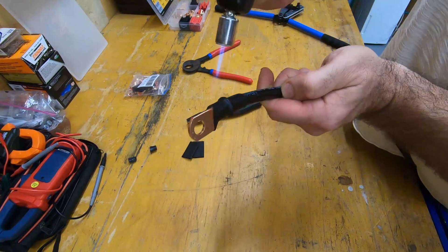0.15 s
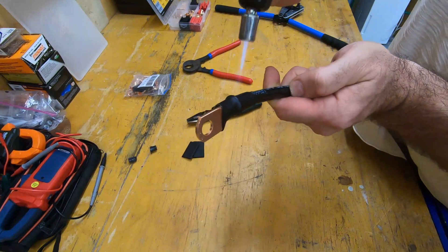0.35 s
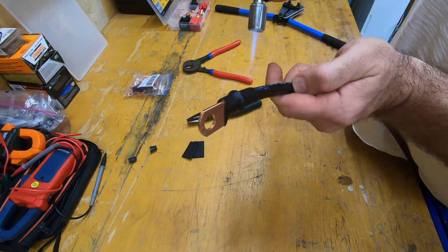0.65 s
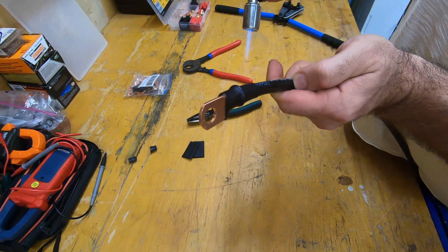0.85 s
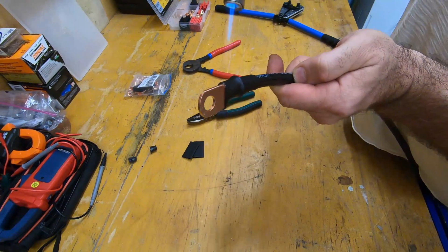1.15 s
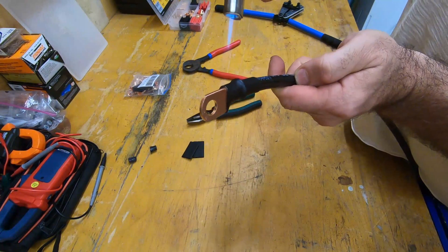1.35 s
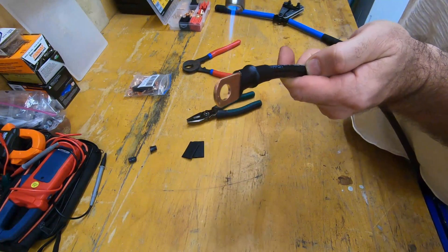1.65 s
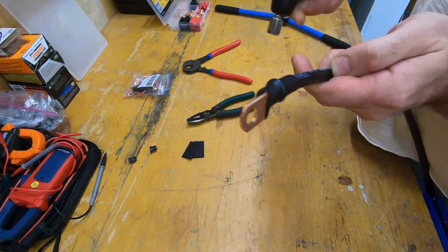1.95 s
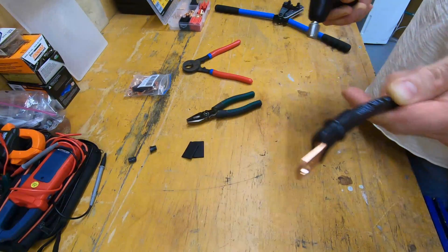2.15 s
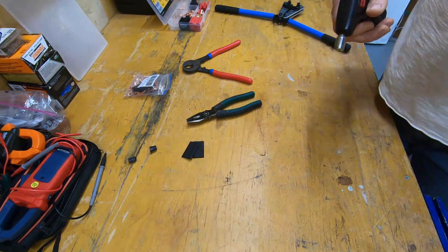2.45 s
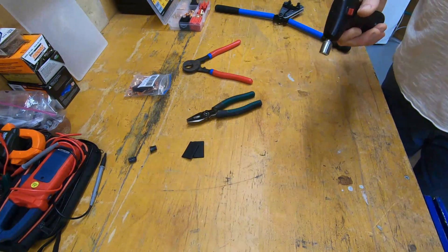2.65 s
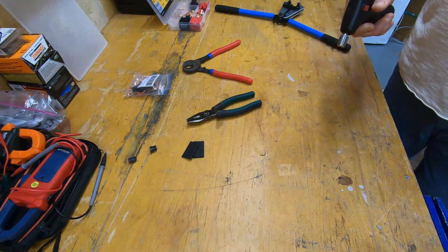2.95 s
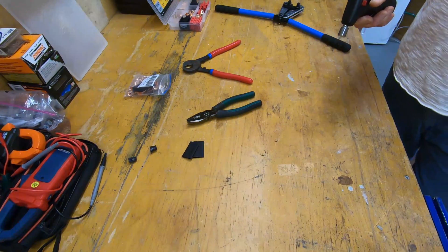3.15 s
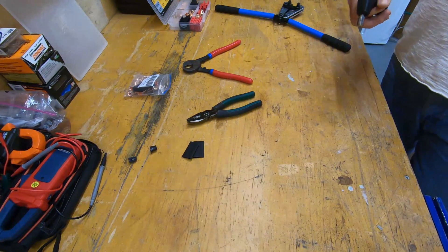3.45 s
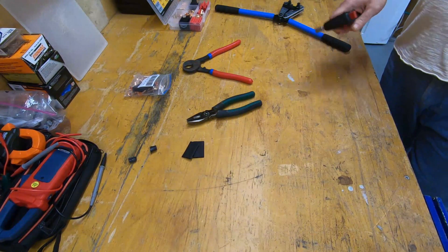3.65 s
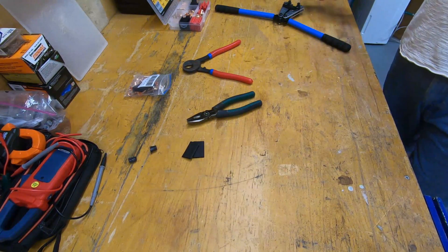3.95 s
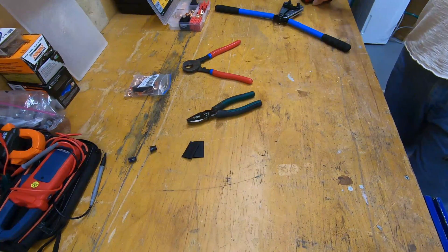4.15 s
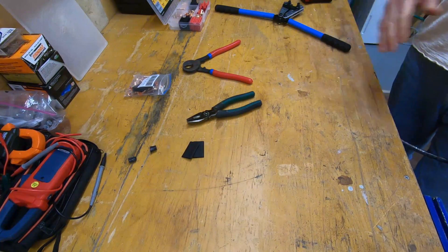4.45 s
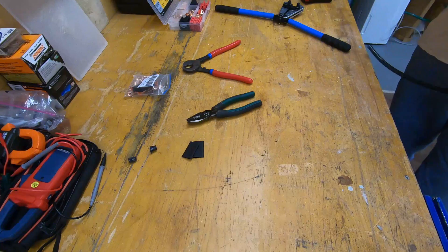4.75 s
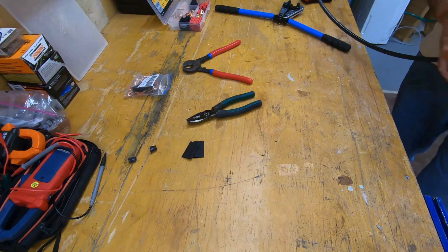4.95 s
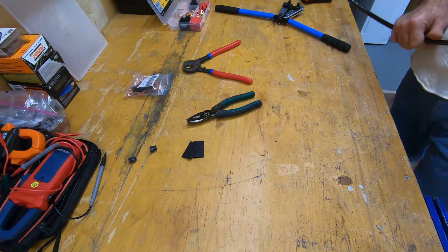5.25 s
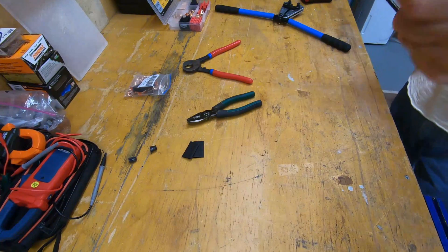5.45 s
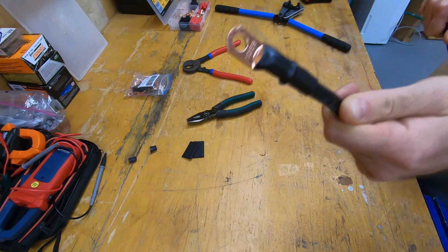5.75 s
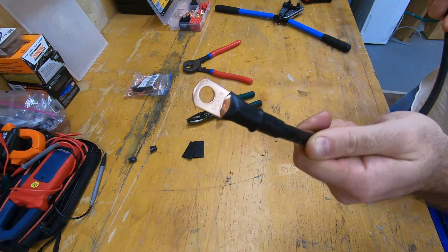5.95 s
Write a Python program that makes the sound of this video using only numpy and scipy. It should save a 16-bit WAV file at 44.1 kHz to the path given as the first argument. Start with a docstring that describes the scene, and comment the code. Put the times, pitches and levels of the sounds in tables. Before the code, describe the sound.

A gas torch hisses steadily, clicks off sharply, then a cable and the torch knock, scrape and clatter on a wooden workbench over low fan rumble.

```python
"""A butane torch hisses over a wooden workbench until its switch clicks off: jet turbulence excites tube modes.
Clicks are impulses filtered by the casing; knocks are decaying bench modes with rattling contacts.
The torch base scrapes by friction and is stood down; a cable rumbles, squeaks and sings amid soft brushes.
A fan rumbles and hums behind it all, as shaped and narrow-band noise."""
import sys
import numpy as np
from scipy import signal
from scipy.fft import rfft, irfft, next_fast_len
from scipy.io import wavfile
from scipy.ndimage import uniform_filter1d, minimum_filter1d

SR = 44100
rng = np.random.default_rng(int(sys.argv[2]) if len(sys.argv) > 2 else 0)


def generate_wav(sig):
    """Save sig (samples, or channels by samples) to the path in sys.argv[1] as 16-bit PCM at SR."""
    pcm = np.round(np.clip(np.atleast_2d(sig).T, -1, 1) * 32767).astype(np.int16)
    wavfile.write(sys.argv[1], SR, pcm)


N = 268833
T = np.arange(N) / SR  # time axis [s]
TOP_HZ = 15700  # upper limit of the final low-pass

# workshop background: (t/s, fan rumble level/dB, air hiss level/dB)
ROOM_LEVELS = [(1.8, -58, -68.5), (2.6, -55.5, -72), (3.7, -50.5, -65), (4.9, -50.5, -67.5),
               (5.9, -52, -71.5)]
# relative spectrum of the background air: (f/Hz, level/dB per Hz)
AIR_SPECTRUM = [(30, -25), (55, -16), (90, -23.5), (140, -5.5), (240, -1.5), (400, -2), (540, -9),
                (1300, -17.5), (2400, -26.5), (3300, -28.5), (4900, -35), (6200, -47), (11000, -54),
                (15500, -72)]
# steady hum lines at the loudest background: (f/Hz, level/dB)
HUM_LINES = [(229, -60.5), (292, -60), (443, -54.5)]
# low boom of the bench after the last heavy knock
BOOM_S, BOOM_DB, BOOM_T60_S = 4.46, -46, 1.7

# pulls of the cable over the bench edge: (t/s at the strongest, level/dB, half length/s)
CABLE_PULLS = [(2.157, -33.5, 0.015), (2.245, -39, 0.097), (2.39, -31.5, 0.032), (2.47, -43, 0.11)]
# relative spectrum of the dragged cable: (f/Hz, level/dB per Hz)
DRAG_SPECTRUM = [(24, -44), (40, -7.5), (76, -15.5), (113, 3.5), (172, -7.5), (215, 3.5), (352, -32),
                 (407, -26.5), (549, -22), (900, -26.5), (1170, -36), (1980, -120)]
# soft brushes and scrapes on the bench: (t/s at the strongest, level/dB, half length/s)
SOFT_BRUSHES = [(2.25, -67, 0.2), (2.41, -57, 0.065), (3.524, -48, 0.014), (4.21, -58, 0.0094),
                (4.27, -60, 0.028), (4.14, -65, .06), (4.6, -69, .17)]
# relative spectrum of the brushes: (f/Hz, level/dB per Hz)
BRUSH_SPECTRUM = [(500, -10.5), (1500, 7.0), (4000, -3.0), (8000, -9.5), (13000, -35.0)]
# squeaks of the cable jacket: (t/s at the strongest, level/dB, half length/s)
JACKET_SQUEAKS = [(4.208, -58, 0.01), (4.277, -52, .022)]
SQUEAK_HZ = 5480
# thin singing of the cable as it slips off the edge; the pitch sags as it slows
SLIP_S, SLIP_END_S, SLIP_FADE_S = 4.33, 4.82, 0.075
SLIP_HZ, SLIP_SAG_HZ_PER_S, SLIP_DB = 1665, 250, -57
# rough partials of the singing: (multiple of its pitch [ratio], width/Hz, level/dB over its tone)
SLIP_PARTIALS = [(1, 60, -10), (1.45, 450, -10), (1.83, 120, -13), (2.005, 130, -10), (2.6, 220, -20)]

# shoves of the torch base over the bench: (t/s at the strongest, level/dB, half length/s)
BASE_SHOVES = [(3.33, -34, 0.06), (3.389, -27, .014), (3.421, -20.5, .018), (3.455, -26.5, .016),
               (3.5, -30.5, 0.12)]
# swell of the scrape over the whole push: (t/s at the strongest, level/dB, half length/s)
WHOLE_PUSH = (3.48, -29, 0.21)
# relative spectrum of the scrape: (f/Hz, level/dB per Hz)
SCRAPE_SPECTRUM = [(40, -27.5), (130, 11.5), (300, -8.5), (650, -1.0),
                   (900, -11.5), (2000, -25.5), (5000, -37.0), (12000, -65)]
# the base judders at a steady rate, then faster as it is pushed home
JUDDER_HZ, PUSH_S, JUDDER_RISE_HZ_PER_S = 252, 3.415, 1100
STAND_S = 3.531  # the torch is stood down

# knocks on the bench: (t/s, thud level/dB, thud top f/Hz, clatter level/dB,
# hardness/dB per octave, rattle time/s, gain of the side signal/dB)
BENCH_KNOCKS = [(.63, -53, 298, -78, -1, 0.019, -8.5), (2.354, -43, 799, -55.5, -9, 0.05, 3.5),
                (2.692, -24.5, 426, -28, -4.5, 0.014, 3.5), (2.716, -24, 403, -35.5, 0.5, 0.012, 3),
                (2.747, -29.5, 257.6, -54, 4, 0.0081, 0.5), (2.791, -36.5, 400, -37.5, 0, .003, 2),
                (2.846, -42, 500, -43, -12, .003, -1), (2.916, -26, 558, -30, -2.5, 0.016, -1),
                (2.984, -36.5, 453, -63, -1, 0.048, -3.5), (3.047, -37, 524, -53.5, -1.5, 0.0074, -7.5),
                (3.085, -41.5, 600, -56.5, -1, 0.016, -5.5), (3.232, -39.5, 820, -55, -0.5, 0.012, -10.5),
                (3.528, -30.5, 803, -31.5, 2, 0.014, -24), (3.540, -26.5, 760, -35, -0.5, 0.014, -25),
                (3.569, -32, 290.2, -62, 1, 0.02, -32), (3.635, -42, 610, -54.5, 3, 0.0064, -24.5),
                (4.215, -26.5, 520, -36, 6.5, 0.025, -47), (4.281, -25.5, 365.4, -25, 5.5, .01, -47.5),
                (4.290, -25, 365, -34, 4, 0.0078, -48.5), (4.301, -28.5, 330, -36, 6, 0.016, -49),
                (4.335, -37, 353, -40, 3, 0.016, -45), (4.505, -30, 720, -48, -5, 0.022, -42.5)]
DARKER_CLATTER_BEFORE_S = 3.4  # earlier knocks have the torch-coloured clatter
CLATTER_HZ = 1032  # the bench top thuds below this, loose tools clatter above
# bands of the dense wood ring: (low f/Hz, high f/Hz)
WOOD_BANDS = [(30, 175), (175, 400), (400, 1000), (1000, 2200), (2200, 4000), (4000, 13500)]
# modes of the bench top and the tools on it: (f/Hz, relative level/dB, t60/s)
BENCH_MODES = [(55.8, -19.5, 1), (107.5, -6.5, 0.36), (138, -9.5, 0.71), (205.6, -4, 0.2),
               (232, -2.5, 0.16), (259.8, 0, 0.2), (343.4, -2, 0.21), (468.5, -14.5, 0.4), (510, -12, 0.41),
               (633, -8, 0.48), (721, -9, 0.26), (918, -15.5, 0.23), (1101, -13.5, 0.19), (1141, -12, 0.14),
               (1527, 0.5, 0.044), (1590, 2.5, 0.057), (1740, -12, 0.11), (2830, -4, 0.053),
               (3053, -7.5, 0.07)]
# dense wood ring, relative spectrum: (f/Hz, level/dB per Hz)
WOOD_SPECTRUM = [(30, -6.5), (75, -8), (112, 9.5), (240, 3), (400, 5), (850, 4.5), (1650, 1.5),
                 (2350, -8.5), (3000, -2), (4000, -18.5), (5500, -23), (8000, -37), (12000, -48),
                 (15500, -52)]
# dense wood ring, decay: (f/Hz, t60/s)
WOOD_DECAY = [(100, 0.43), (600, 0.25), (3000, 0.23), (12000, 0.2)]
# stereo width of the knocks: (f/Hz, gain of the side signal/dB)
SIDE_GAIN = [(60, -3.5), (105, -9), (140, 3), (220, -21), (380, -23.5), (520, -5), (1000, -4.5), (1550, 3),
             (2400, -14), (3200, -3), (4500, -6), (9000, 2)]
# resonances and hollows of the torch in its clatter: (f/Hz, width/Hz, level/dB)
TORCH_COLOUR = [(2480, 750, -15), (5800, 1400, -12), (7750, 600, 7), (9550, 700, 6), (11250, 500, 8),
                (12900, 300, 7)]
# the torch taps the bench: (t/s, gain of the body modes/dB, gain of the nozzle modes/dB)
TORCH_TAPS = [(2.693, 2.5, -28), (2.792, -10, -34), (2.847, -20, -40), (2.917, -0.5, -36), (3.530, 0, 2),
              (3.553, -9, 1.5)]
# modes of the torch body, before the gain of each tap: (f/Hz, level/dB, t60/s)
BODY_MODES = [(1120, -37, .1), (1450, -35, .12), (1620, -27, .08), (1790, -38, .15), (2945, -43.5, .25),
              (3170, -47, .1), (3450, -38, .08), (7750, -65, .17)]
# modes of the steel nozzle with a beating pair, before the gain of each tap: (f/Hz, level/dB, t60/s)
NOZZLE_MODES = [(2240, -47, .25), (2929, -42, .26), (3025, -45, .17), (4740, -57, .26), (5795, -42.5, .22),
                (5824, -51, .22), (7700, -62, .17), (9420, -62, .17), (11050, -63, .15), (12950, -66, .14)]
# modes of the hollow torch base as it is stood down: (f/Hz, level/dB, t60/s)
BASE_MODES = [(500, -24, 0.26), (630, -16.5, 0.14), (722, -25, 0.3)]

# small hard clicks of the torch and the hand:
# (t/s, relative level/dB, tilt/dB per octave, latch resonance/dB)
HARD_CLICKS = [(0.029, -37, 1, -4), (.245, -45, 6, 0), (0.506, -38, 3, 4), (1.78, -24, -0.5, 10),
               (1.7947, -17, 2.5, 12.5), (1.834, -27.5, -10, 10), (1.8795, -6.5, -0.5, 2),
               (2.238, -55, 10, 3.5), (2.284, -51, 7, -8), (3.226, -42, -9, 13), (3.488, -45, -1.5, 7),
               (3.73, -47.5, -5.5, 12)]
# relative spectrum of the torch casing: (f/Hz, level/dB per Hz)
CASING_SPECTRUM = [(300, -40), (700, -22), (1100, -3), (2050, 1), (2500, -8), (3400, -.5), (4150, -7.5),
                   (4900, 4), (5500, -9), (7700, -7.5), (8600, -14), (9650, -7.5), (10400, -21),
                   (13900, -26), (15500, -37.5)]
# side signal of a click: (f/Hz, gain/dB)
CLICK_SIDE_GAIN = [(2000, -5.0), (5000, -13.0), (9000, -1.0)]
LATCH_HZ, LATCH_WIDTH_HZ = 3530, 800  # resonance of the trigger latch
BEND_S = 0.002  # time that a 1 kHz bending wave takes along the casing

# the flame as the hand moves it, before the band levels below:
# (t/s, roar level/dB, hiss level/dB, finest hiss level/dB)
FLAME_LEVELS = [(0.0, -51, -51.5, -59), (0.092, -52.5, -54.5, -62), (0.25, -52, -53.5, -60),
                (0.42, -51, -52.5, -62), (0.44, -55, -54, -61), (0.484, -50.5, -55, -60),
                (0.636, -51, -53, -59.5), (1.136, -49.5, -53.5, -61.5), (1.186, -51.5, -54, -58),
                (1.352, -49, -51, -60.5), (1.548, -49.5, -53.5, -59.5), (1.724, -49.5, -51.5, -58.5),
                (1.76, -49, -51.5, -59)]
ROAR_DB, HISS_DB, FINE_DB = 1.5, -0.5, -0.5
FLAME_OFF_S = 1.875
# relative spectrum of the jet: (f/Hz, level/dB per Hz)
JET_SPECTRUM = [(40, -28), (100, -27.5), (170, -14.5), (245, 1.5), (370, -2.5), (600, -6), (1000, -7),
                (1280, -11.5), (1700, -9.5), (2600, -10.5), (4100, -15), (6400, -15.5), (9500, -23),
                (10600, -33), (15500, -43.5)]
# burner tube resonances: (f/Hz, width/Hz, level/dB over the jet)
BURNER_MODES = [(860, 92, 4), (1439, 89, 4), (3353, 240, 1.5), (4770, 830, 5), (8150, 1100, 3.5),
                (9580, 270, 4.5)]
# flame returned by the walls: (f/Hz, relative gain/dB)
WALL_GAIN = [(150, 4.5), (400, -2), (1200, 6), (2200, 0), (3700, -7), (5000, 2), (7000, 0)]
# early reflections off bench and hand: (lag/s, wander of the lag/s, share [signed ratio])
REFLECTIONS = [(.00033, .00003, -.17), (.00064, .00002, .16), (.00138, .00004, .2), (.00205, .00006, .15)]
# main tube resonance: centre, width, wander of the centre, level before the hiss gain
TUBE_HZ, TUBE_WIDTH_HZ, TUBE_DRIFT_HZ, TUBE_DB = 4930, 250, 105, -6


def undb(db):
    """Level difference: convert decibels to amplitude gain."""
    return 10 ** (np.asarray(db) / 20)


def level(x, db=0):
    """Mean-square normalisation: set the rms level in dB."""
    return x * undb(db) / np.sqrt(np.mean(x ** 2) + 1e-30)


def curve(rows):
    """Linear interpolation: read each column of a timed table sample by sample."""
    s, *columns = np.transpose(rows)
    return [np.interp(T, s, column) for column in columns]


def at(points, hz):
    """Logarithmic pitch axis: interpolate (f/Hz, value) points."""
    f, value = np.transpose(points)
    return np.interp(np.log(hz + 1), np.log(f), value)


def humps(rows, f):
    """Resonance: sum the bell-shaped responses in dB."""
    return sum(db / (1 + (2 * (f - hz) / width) ** 2) for hz, width, db in rows)


def shape(x, gain):
    """Linear filtering: multiply the spectrum by a function of frequency."""
    size = next_fast_len(x.shape[-1])
    f = np.arange(size // 2 + 1) * SR / size
    return irfft(rfft(x, size) * gain(f), size)[..., :x.shape[-1]]


def spread(mid, side):
    """Middle-and-side stereo: the side signal enters the ears with opposite signs."""
    return mid + side * np.array([[1], [-1]])


def noise(width, size=N):
    """Partial coherence: stereo white noise with width as side over middle."""
    mid, side = rng.standard_normal((2, size))
    return spread(mid, width * side) / np.sqrt(1 + width ** 2)


def coloured(points, width, size=N):
    """Spectral shaping: stereo noise of a given spectrum and unit rms."""
    return level(shape(noise(width, size), lambda f: undb(at(points, f))))


def walk(rate):
    """Low-pass random fluctuation: Gaussian cutoff at rate/Hz, unit rms."""
    return level(shape(rng.standard_normal(N), lambda f: np.exp(-(f / rate) ** 2)))


def band(x, lo, hi, order=3):
    """Band limitation: causal Butterworth band-pass."""
    return signal.sosfilt(signal.butter(order, [lo, hi], "band", fs=SR, output="sos"), x)


def pan(db):
    """Interaural level difference: left and right gains."""
    return undb(np.array([[db], [-db]]) / 2)


def fade(t, t60):
    """Exponential decay: a fall of 60 dB in t60."""
    return np.exp(-np.log(1000) * t / t60)


def add(out, s, x):
    """Superposition: mix a sound in at a time."""
    i = int(s * SR)
    out[:, i:i + x.shape[-1]] += x[..., :N - i]


def ring(modes, scatter_db):
    """Modal superposition: each blow excites damped modes with strengths of its own, for one second."""
    hz, db, t60 = np.transpose(modes)[:, :, None]
    size, detune, turn = rng.standard_normal((len(modes), 3)).T[:, :, None]
    t = T[:SR]
    swing = undb(db + scatter_db * size) * fade(t, t60)
    return np.sum(swing * np.sin(2 * np.pi * (hz * (1 + 0.0028 * detune) * t + turn)), axis=0)


def strike(points, size=1024):
    """Minimum phase: the causal impulse response of a body with a given spectrum."""
    cepstrum = irfft(np.log(undb(at(points, np.arange(size // 2 + 1) * SR / size))))
    # fold the cepstrum onto positive times
    cepstrum[1:size // 2] *= 2
    cepstrum[size // 2 + 1:] = 0
    return irfft(np.exp(rfft(cepstrum)))


def oscillate(hz):
    """Phase accumulation: a unit sine whose frequency may vary."""
    return np.sin(2 * np.pi * np.cumsum(hz) / SR)


def narrow_band(hz, width_hz):
    """Quadrature modulation: a moving pitch whose strength and phase wander."""
    phase = 2 * np.pi * np.cumsum(hz) / SR
    return walk(width_hz) * np.sin(phase) + walk(width_hz) * np.cos(phase)


def mirrored(x, paths):
    """Image sources: add reflections whose lags move."""
    return x + sum(share * np.interp(T - lag_s, T, x) for lag_s, share in paths)


def swells(rows):
    """Power addition: strokes each grow to their strongest moment and die away."""
    power = sum(undb(2 * db) * np.exp(-2 * np.abs((T - s) / half_s) ** 1.3) for s, db, half_s in rows)
    return np.sqrt(power)


def held(start_s, end_s, fade_s):
    """Trapezoidal envelope: attack, hold and release."""
    return np.clip(np.minimum(T - start_s, end_s - T) / fade_s, 0, 1)


def workshop():
    """Broadband and tonal noise: fan rumble, hum and air hiss, with a late decaying low mode of the bench."""
    fan_db, hiss_db = curve(ROOM_LEVELS)
    lows = lambda f: 1 / (1 + (f / 1600) ** 4)
    air = coloured(AIR_SPECTRUM, 0.018)
    fan = level(shape(air, lows)) * undb(fan_db + 0.46 * walk(5.5))
    hiss = level(shape(air, lambda f: 1 - lows(f))) * undb(hiss_db + 0.69 * walk(12))
    hum = sum(undb(db) * narrow_band(np.full(N, hz), 16) for hz, db in HUM_LINES)
    hum = hum * undb(1.1 * (fan_db - np.max(fan_db)))  # the hum follows the background level
    sway = oscillate(56 + 2.3 * walk(6.2)) * undb(3 * walk(9))
    onset = np.clip((T - BOOM_S) / 0.06, 0, 1)
    boom = sway * undb(BOOM_DB) * onset * fade(T - BOOM_S, BOOM_T60_S)
    return fan + hiss + hum + boom


def cable():
    """Sliding friction: the cable rumbles over the edge amid soft brushes, squeaks, and sings as it slips off."""
    rumble = coloured(DRAG_SPECTRUM, 1.0) * swells(CABLE_PULLS)
    brush = coloured(BRUSH_SPECTRUM, 0.62) * swells(SOFT_BRUSHES) * undb(2 * walk(40))
    hz = SLIP_HZ - SLIP_SAG_HZ_PER_S * (T - SLIP_S)
    tone = oscillate(hz * (1 + 0.00762 * walk(83.5))) * undb(2.3 * walk(30))
    partials = sum(undb(db) * narrow_band(ratio * hz, width_hz) for ratio, width_hz, db in SLIP_PARTIALS)
    singing = (tone + partials) * undb(SLIP_DB) * held(SLIP_S, SLIP_END_S, SLIP_FADE_S)
    squeak = narrow_band(np.full(N, SQUEAK_HZ), 164) * swells(JACKET_SQUEAKS)
    return rumble + brush + squeak + singing


def slide():
    """Frictional judder: the torch base scrapes the wood and judders faster as it nears its standing place."""
    hz = JUDDER_HZ + JUDDER_RISE_HZ_PER_S * np.clip(T - PUSH_S, 0, STAND_S - PUSH_S)
    judder = np.sqrt(2) * oscillate(hz * (1 + 0.0864 * walk(73.9))) * undb(1.2 * walk(45))
    speed_db = 12 * np.log2(hz / 280)  # faster judder goes with a louder scrape
    overtone = narrow_band(1.9 * hz, 130) * undb(-17 + speed_db)
    scrape = coloured(SCRAPE_SPECTRUM, 0.072) * undb(-12.5 + speed_db)
    catches = undb(2.5 * walk(110))
    # the base judders with each shove, while the rough scrape under it swells evenly
    shudder = (undb(-5) * judder + undb(-6) * narrow_band(hz, 115)) * swells(BASE_SHOVES)
    rasp = (overtone + scrape) * catches * swells([WHOLE_PUSH])
    return (shudder + rasp) * held(3.22, 3.55, 0.0057)


def knock(torch_coloured, thud_db, thud_hz, clatter_db, hardness_db, rattle_s):
    """Impact excitation: a blow rings the bench modes, and loose tools repeat it in brief random contacts."""
    t = T[:SR]
    wood = coloured(WOOD_SPECTRUM, 0, SR)[0]
    dense = sum(band(wood, lo, hi) * fade(t, at(WOOD_DECAY, np.sqrt(lo * hi))) for lo, hi in WOOD_BANDS)
    contact_rise = (1 - fade(t, 0.0011)) ** 2  # the contact takes a moment to build
    body = (level(ring(BENCH_MODES, 3.5)) + level(dense, -0.54)) * contact_rise
    contacts = rng.random(SR) < 700 / SR  # 700 per second on average, before they die away
    bounces = 0.24 * contacts * rng.uniform(-1.77, 1.2, SR) * np.exp(-(t / rattle_s) ** 2)
    bounces[0] = 1  # the blow itself
    sound = signal.fftconvolve(body, bounces)[:SR]
    # a soft, heavy landing stirs only the lowest notes of the bench
    thud = band(band(sound, 23, thud_hz, order=2), 25, CLATTER_HZ)
    # a harder contact tilts the clatter towards the treble
    contact = strike([(hz, hardness_db * np.log2(hz / CLATTER_HZ)) for hz in (CLATTER_HZ, 7000)])
    if torch_coloured:
        hz = np.geomspace(CLATTER_HZ, TOP_HZ, 256)
        contact = np.convolve(contact, strike(np.column_stack([hz, humps(TORCH_COLOUR, hz)])))
    clatter = band(signal.fftconvolve(sound, contact)[:SR], CLATTER_HZ, 13500, order=4)
    # levels hold for the first 50 ms
    parts = [(thud, thud_db), (clatter, clatter_db)]
    return sum(part * undb(db) / np.std(part[:SR // 20]) for part, db in parts)


def knocks():
    """Coupled vibration: blows ring the bench, and taps ring the torch's body, nozzle and base."""
    mid, side = np.zeros((2, 1, N))
    t = T[:SR]
    for s, *blow, side_db in BENCH_KNOCKS:
        torch_coloured = s < DARKER_CLATTER_BEFORE_S
        add(mid, s, knock(torch_coloured, *blow))
        if side_db > -20:
            add(side, s, knock(torch_coloured, *blow) * undb(side_db))
    for s, body_db, nozzle_db in TORCH_TAPS:
        add(mid, s, ring(BODY_MODES, 0.94) * undb(body_db) * (1 - fade(t, 0.0016)))
        add(mid, s, ring(NOZZLE_MODES, 0.72) * undb(nozzle_db) * (1 - fade(t, 0.008)))
    add(mid, STAND_S, ring(BASE_MODES, 1) * (1 - fade(t, 0.0024)))
    return spread(mid, shape(side, lambda f: undb(at(SIDE_GAIN, f))))


def clicks():
    """Impulse response with dispersion: snaps ring the casing for milliseconds; a diffuse tail follows."""
    out, t = np.zeros((2, N)), T[:SR // 2]
    # low bending waves travel slowly and arrive late
    dispersion = lambda f: np.exp(-4j * np.pi * BEND_S * np.sqrt(1000 * f))
    for s, db, tilt_db, latch_db in HARD_CLICKS:
        latch = [(LATCH_HZ, LATCH_WIDTH_HZ, latch_db)]
        colour = [(hz, g + tilt_db * np.log2(hz) + humps(latch, hz)) for hz, g in CASING_SPECTRUM]
        mid, side = rng.standard_normal((2, len(t))) * (fade(t, 0.02) + 0.099 * fade(t, 0.099))
        mid = mid * (1 - fade(t, 0.012))
        mid[0] += 11  # one hard contact
        # short waves reach the two ears by different paths
        side = shape(side, lambda f: undb(at(CLICK_SIDE_GAIN, f)))
        ears = shape(spread(mid, side), dispersion)
        snap = signal.fftconvolve(ears, strike(colour)[None], axes=1)[:, :SR // 20]
        tail = coloured([(hz, 0.67 * g) for hz, g in colour], 0.41, len(t))
        tail = tail * (1 - fade(t, 0.016)) * fade(t, 0.35)
        add(out, s, level(snap, db - 19.5) * pan(2.7))
        add(out, s, band(tail, 700, 9500, order=2) * undb(db - 28.5))
    return out


def torch():
    """Turbulent jet noise: it rings the burner tube, and reflections of moving lag comb its spectrum."""
    roar_db, hiss_db, fine_db = curve(FLAME_LEVELS)
    tube = lambda f: undb(at(JET_SPECTRUM, f) + humps(BURNER_MODES, f))
    above = lambda f, hz: 1 / (1 + (hz / (f + 1)) ** 8)
    paths = [(lag_s + wander_s * walk(6.4), share) for lag_s, wander_s, share in REFLECTIONS]
    direct = level(mirrored(shape(rng.standard_normal(N), tube), paths)) * pan(2.4)
    walls = level(shape(noise(0.84), lambda f: tube(f) * undb(at(WALL_GAIN, f))), -3.0)
    flame = (direct + walls) * undb(0.55 * walk(23))
    roar = level(shape(flame, lambda f: 1 - above(f, 2200)), ROAR_DB)
    hiss = level(shape(flame, lambda f: above(f, 2200) * (1 - above(f, 6500))), HISS_DB)
    # the main tube resonance swells, sinks and drifts with the gas flow
    sing = level(narrow_band(TUBE_HZ + TUBE_DRIFT_HZ * walk(2.5), TUBE_WIDTH_HZ), TUBE_DB)
    sing = sing * undb(2.2 * walk(6)) * pan(2.2)
    # the finest hiss is scattered widely
    fine = np.array([mirrored(ear, paths) for ear in noise(0.74)])
    fine = level(shape(fine, lambda f: tube(f) * above(f, 6500)), FINE_DB)
    gas = fade(np.maximum(T - FLAME_OFF_S, 0), 0.065)  # the flame dies when switched off
    return (roar * undb(roar_db) + (hiss + sing) * undb(hiss_db) + fine * undb(fine_db)) * gas


def scene():
    """Superposition: sum the background and all sources at the bench."""
    return workshop() + cable() + slide() + knocks() + clicks() + torch()


def record(dry):
    """Peak limiting and band limitation: duck sharp peaks for a few milliseconds, then cut the top."""
    allowed = 0.65 / np.maximum(np.max(np.abs(dry), axis=0), 0.65)
    gain = uniform_filter1d(minimum_filter1d(allowed, size=65), size=65)
    return signal.sosfilt(signal.ellip(8, 0.2, 70, TOP_HZ, fs=SR, output="sos"), dry * gain)


dry = scene()
out = record(dry)
generate_wav(out)
```